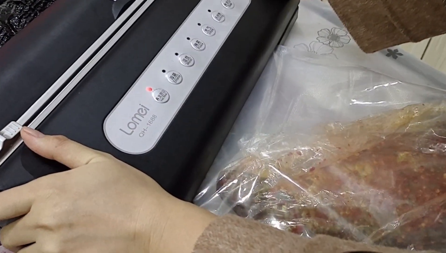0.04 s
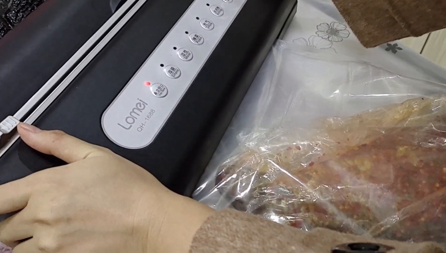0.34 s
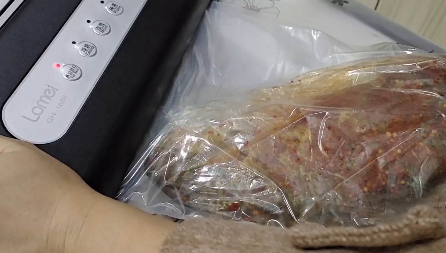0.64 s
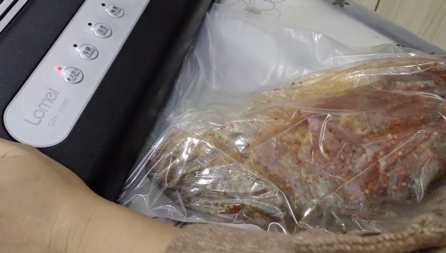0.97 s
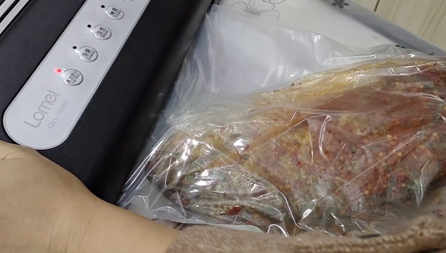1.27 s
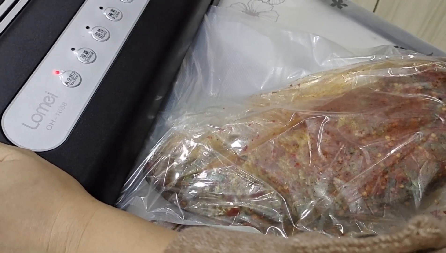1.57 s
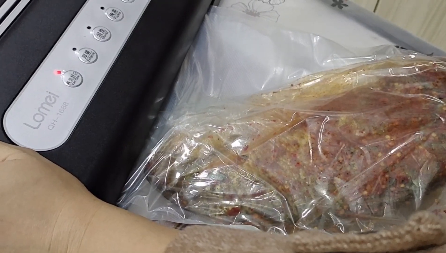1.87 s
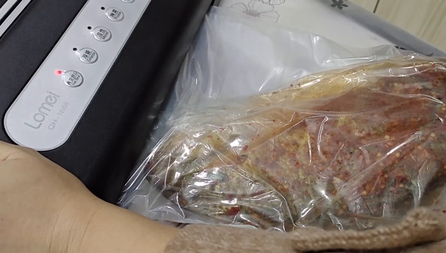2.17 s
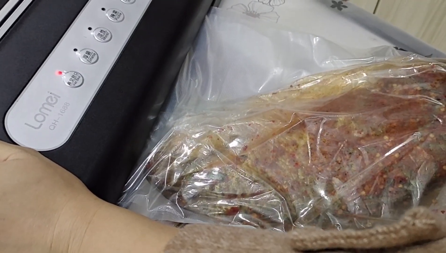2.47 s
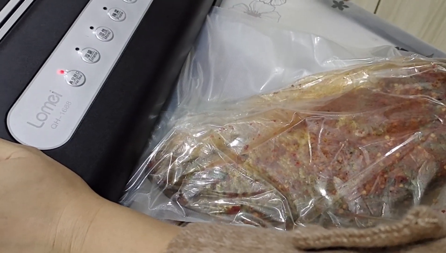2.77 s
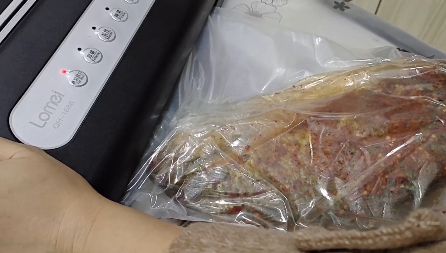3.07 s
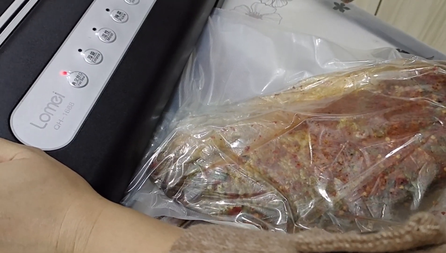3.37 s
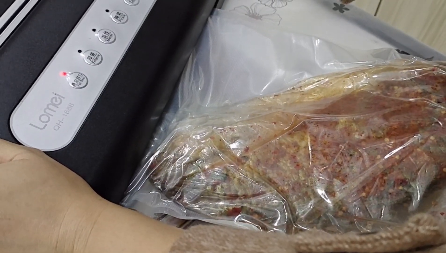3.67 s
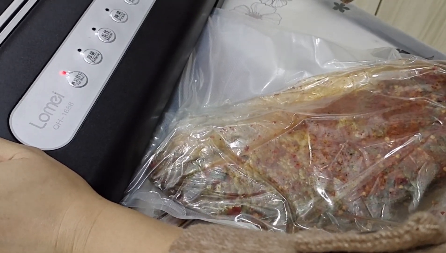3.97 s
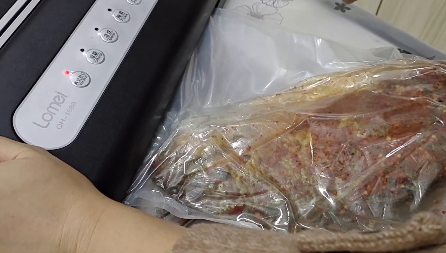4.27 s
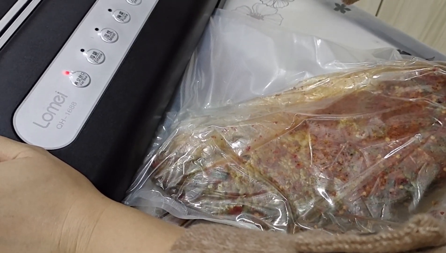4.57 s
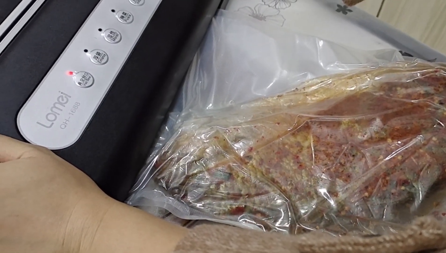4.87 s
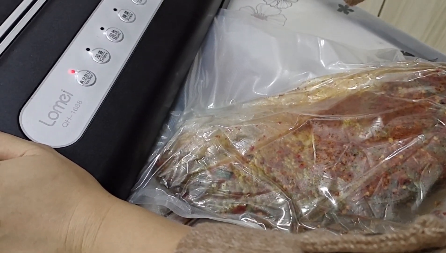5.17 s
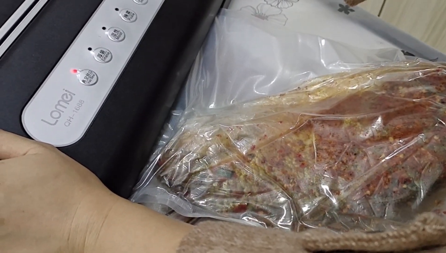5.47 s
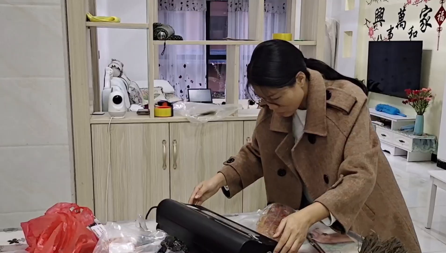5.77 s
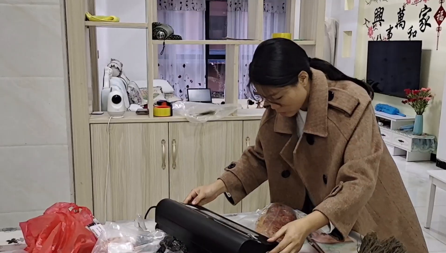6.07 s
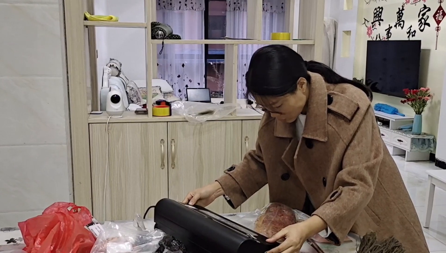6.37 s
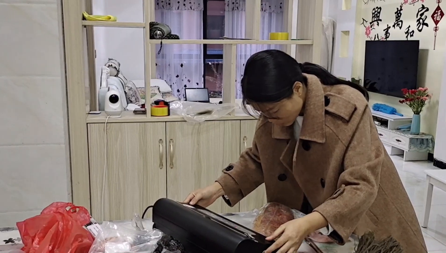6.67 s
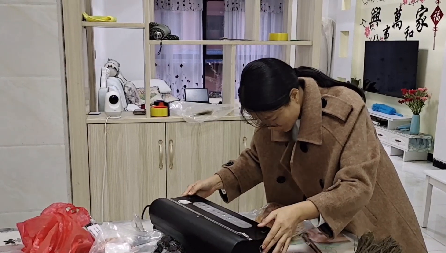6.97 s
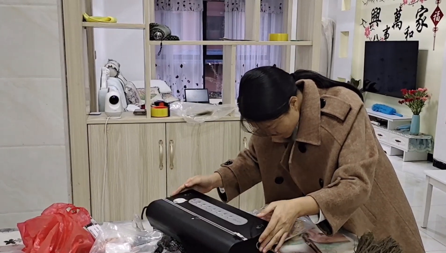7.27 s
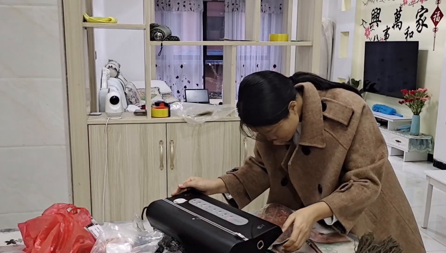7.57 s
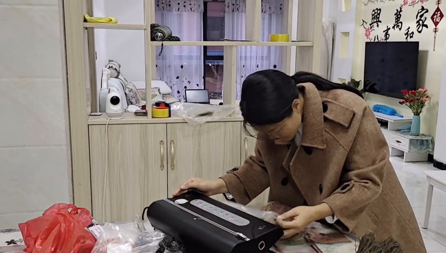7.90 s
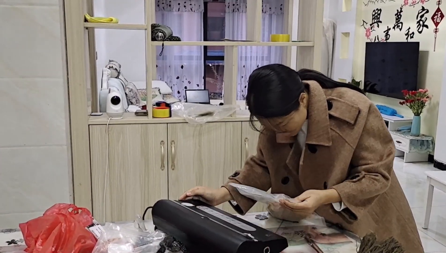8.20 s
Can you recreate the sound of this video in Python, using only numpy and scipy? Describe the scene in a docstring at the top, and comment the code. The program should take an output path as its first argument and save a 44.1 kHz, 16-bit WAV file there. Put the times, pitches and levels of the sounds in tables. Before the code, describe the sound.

Close buzzing drone of a countertop vacuum sealer with faint plastic crackles, followed by more distant knocks and a sharp lid clack.

```python
"""A buzzing drone over a ticking plastic bag, then a lid snapping shut: a countertop vacuum sealer.
Its piston pump, heard close up from two positions, turns about 45 times a second and slows under load.
Each turn gives a thump, a puff of air, valve clacks and a casing rattle; the bag's creases give way.
Then, from across a tiled room, the lid is handled and shut, the latch pressed and the bag picked up."""
import sys
import numpy as np
from scipy import signal
from scipy.fft import rfft, irfft, next_fast_len
from scipy.io import wavfile

SR = 44100
rng = np.random.default_rng(int(sys.argv[2]) if len(sys.argv) > 2 else 0)


def wav_out(sig):
    """Save sig, one row per channel (or a flat mono array), as 16-bit PCM at SR to the path in sys.argv[1]."""
    wavfile.write(sys.argv[1], SR, np.round(np.clip(np.atleast_2d(sig).T, -1, 1) * 32767).astype(np.int16))


N = 363384
TIME = np.arange(N) / SR
SWITCH_S, AWAY_S = .399, 5.692   # the scene changes: to a second close view, then across the room
FIRST_HZ, FREE_HZ, LOADED_HZ = 45.55, 44.845, 44.53   # pump speed: first position, slack bag, empty bag

# spectrum of cracking plastic: f/Hz, level/dB
CRACK_SPECTRUM = [(1500, -3.5), (2800, 6.5), (4400, 6), (7000, 3), (10000, -14), (15500, -19.5)]


def from_db(db):
    return 10 ** (np.asarray(db) / 20)


def rms_one(x):
    return x / np.sqrt(np.mean(x ** 2) + 1e-20)


def smooth_step(x):
    x = np.clip(x, 0, 1)
    return x * x * (3 - 2 * x)


def at_hz(points, hz):
    """Curve read on a log-frequency axis."""
    points_hz, values = np.transpose(points)
    return np.interp(np.log(hz + 1e-9), np.log(points_hz), values)


def pan(db):
    """Stereo gains; db is left minus right."""
    return from_db(np.array([[db], [-db]]) / 2)


def gate(start_s, end_s, fade_s=0.0015):
    return np.clip((TIME - start_s) / fade_s, 0, 1) * np.clip((end_s - TIME) / fade_s, 0, 1)


def decay(t60_s, size):
    return np.exp(-np.log(1000) * TIME[:size] / t60_s)


def mode(hz, t60_s, size):
    return np.sin(2 * np.pi * hz * TIME[:size]) * decay(t60_s, size)


def colour(x, spectrum):
    """Band-limited spectral shaping; white noise keeps its power."""
    size = next_fast_len(x.shape[-1], True)
    hz = np.arange(size // 2 + 1) * SR / size
    gain = from_db(at_hz(spectrum, hz))
    gain /= 1 + (hz / spectrum[-1][0] / 1.2) ** 8
    gain /= 1 + (.8 * spectrum[0][0] / (hz + 1)) ** 8
    return irfft(rfft(x, size) * rms_one(gain), size)[..., :x.shape[-1]]


def noise(size=N, apart_hz=900):
    """Stereo noise, alike in the bass, unrelated in the treble."""
    mid, side = rng.standard_normal((2, size))
    side = signal.sosfilt(signal.butter(1, apart_hz, "high", fs=SR, output="sos"), side)
    return rms_one(mid + side * np.array([[1], [-1]]))


def clicks(times_s, heights):
    out = np.zeros(N)
    np.add.at(out, np.clip(np.round(np.asarray(times_s) * SR).astype(int), 0, N - 1), heights)
    return out


def ring(x, hz, t60_s):
    """Resonator: a unit click starts a unit sine."""
    r, w = from_db(-60 / (t60_s * SR)), 2 * np.pi * hz / SR
    return signal.lfilter([0, np.sin(w)], [1, -2 * r * np.cos(w), r * r], x + 1e-18)


def convolve(x, response):
    return signal.oaconvolve(np.atleast_2d(x), response, axes=1)[:, :N]


def room_tone():
    """Faint, low noise of the quiet room."""
    # noise spectrum: f/Hz, level/dB
    spectrum = [(24, -40), (40, -13.5), (213, 1.5), (333, -2), (407, -8), (758, -10), (1910, -24.5),
                (6980, -29), (8310, -35), (15500, -51)]
    return from_db(-66.5) * colour(noise(), spectrum)


def room_tail(onset_s=0.009):
    """Diffuse reflections, dying fastest in the top treble; unit energy."""
    # room decay: f/Hz, t60/s
    decay_times = [(100, 0.21), (300, 0.62), (540, 0.6), (900, 0.46), (2500, 0.56), (6000, 0.54),
                   (9000, .42), (15000, 0.14)]
    edges_hz = np.geomspace(50, 16000, 15)
    tail = 0
    for low, high in zip(edges_hz, edges_hz[1:]):
        bandpass = signal.butter(2, [low, high], "band", fs=SR, output="sos")
        band = signal.sosfilt(bandpass, noise(SR, apart_hz=1000))
        tail += band * decay(at_hz(decay_times, np.sqrt(low * high)), SR)
    return rms_one(tail * np.clip(TIME[:SR] / onset_s, 0, 1)) / np.sqrt(SR)


def movements(rows, t, attack_s=0.013, t60_s=0.18):
    """Envelope of hand movements: each swells, holds and dies away."""
    envelope = 0
    for start_s, length_s, db in rows:
        swell = np.clip((t - start_s) / attack_s, 0, 1)
        release = from_db(-60 * np.maximum(t - start_s - length_s, 0) / t60_s)
        envelope = np.maximum(envelope, from_db(db) * swell * release)
    return envelope


def handling(grains_per_s=2800):
    """Hands rub dully on the housing; sleeves and bag rustle in dense grains."""
    # hand movements: t/s, length/s, level/dB
    rubs = [(5.69, .22, -59.5), (5.94, 0.27, -59.5), (6.44, .05, -67), (7.03, 0.08, -53), (7.19, .06, -57),
            (7.3, 0.11, -67), (7.55, .05, -67.5), (8.0, 0.2, -65.5)]
    rustles = [(5.69, 0.026, -59.5), (5.78, 0.093, -60), (6.06, 0.11, -74.5), (6.44, 0.033, -72),
               (6.98, 0.052, -62), (7.05, 0.063, -52), (7.19, 0.022, -64), (7.31, 0.084, -71),
               (7.78, 0.14, -74), (7.925, 0.081, -55), (8.03, 0.12, -58)]
    # their spectra: f/Hz, level/dB
    rub_spectrum = [(60, -14.5), (150, -3), (280, 4.5), (420, -4), (700, -7), (1100, -25), (1600, -31.5),
                    (2500, -18.5)]
    rustle_spectrum = [(450, -6), (750, 0.5), (1100, 5.5), (1500, -2.5), (1950, -8), (2350, 0), (3000, 1.5),
                       (4200, -7.5), (7300, -7), (9000, -28.5), (11000, -37.5), (15500, -32.5)]
    start = int(AWAY_S * SR)
    t = TIME[start:]
    grains = signal.lfilter([1], [1, -.95], rng.random(len(t)) < grains_per_s / SR)
    rustle = movements(rustles, t) * colour(rms_one(noise(len(t)) * grains), rustle_spectrum)
    rub = movements(rubs, t) * colour(noise(len(t)), rub_spectrum)
    return np.pad(from_db(-2) * rub + pan(5) * rustle, ((0, 0), (start, 0)))


def table_bumps(swell_s=0.011):
    """The machine rocks on its rubber feet: soft thuds and hollow knocks."""
    # knocks on the table: t/s, f/Hz, level/dB, t60/s
    knocks = [(5.839, 289.3, -42.5, 0.25), (5.851, 221.6, -40.5, 0.17), (5.898, 285, -40.5, 0.099),
              (6.086, 410, -48, 0.11), (6.258, 252, -46.5, 0.19), (6.295, 251.5, -47.5, 0.13),
              (7.066, 812, -41, .2), (7.08, 223, -31, 0.078), (7.188, 386, -43, 0.08),
              (7.204, 335.6, -37, 0.075), (7.21, 950, -41, .06), (7.87, 119.6, -56, 0.57)]
    return sum(ring(clicks([s], from_db(db)), hz, t60_s) * smooth_step((TIME - s) / swell_s)
               for s, hz, db, t60_s in knocks)


def creases(rows, spectrum, gain_db, t60_s, size=4096):
    """Each crease gives way in a short noise burst."""
    out = np.zeros((2, N + size))
    for s, db in rows:
        burst = colour(noise(size) * decay(t60_s, size), spectrum)
        out[:, int(s * SR):int(s * SR) + size] += from_db(db + gain_db) * burst
    return out[:, :N]


def bag_lifted():
    """The bag snaps as it is picked up."""
    # snaps: t/s, level/dB
    snaps = [(7.3816, -53), (7.9349, -41), (7.9872, -38.5), (8.1244, -45), (8.1648, -38), (8.177, -34)]
    return creases(snaps, CRACK_SPECTRUM, gain_db=-8.5, t60_s=0.036)


def bag_shrinking(small_count=16):
    """Large creases crack and ring the taut film; small ones tick at random."""
    # large creases: t/s, level/dB
    large = [(.6116, -45), (1.0177, -40), (1.1239, -47), (1.262, -41), (1.3228, -38), (1.6153, -46),
             (1.689, -36), (2.3516, -44), (2.3639, -37.5), (2.5751, -45), (2.59, -37.5), (2.7522, -43),
             (2.9996, -50), (3.0124, -38), (3.048, -42), (3.07, -45), (3.129, -41), (3.284, -43),
             (3.491, -40), (3.5364, -41), (3.6068, -32), (3.613, -42), (3.9838, -35), (4.057, -40.5),
             (4.2219, -38), (4.29, -37), (4.8579, -44), (4.8759, -37)]
    # ringing film: f/Hz, level/dB
    film_spectrum = [(1800, -6), (2600, 0.5), (3400, 1.5), (4400, 0.5), (5500, -6), (8000, -15)]
    cracks = creases(large, CRACK_SPECTRUM, gain_db=2.5, t60_s=0.017)
    film = creases(large, film_spectrum, gain_db=-4.5, t60_s=0.035)
    small = zip(rng.uniform(SWITCH_S, AWAY_S, small_count), rng.normal(-46, 3, small_count))
    ticks = creases(small, CRACK_SPECTRUM, gain_db=0, t60_s=0.021)
    return (cracks + film + ticks) * pan(-0.79)


def latches(size=4096):
    """A catch springs over its edge: a sharp crack and the ring of the stiff plastic hook."""
    # catches: t/s, level/dB, low-pass/Hz
    catches = [(5.832, -40, 2500), (6.5874, -19, 14000), (6.599, -24, 8000), (7.0614, -34.5, 5600)]
    # hook modes: f/Hz, level/dB, t60/s
    hook_modes = [(2490, -9.5, 0.03), (3030, -3.5, .035), (3580, -3.5, 0.04), (4260, -9, .025),
                  (5000, -6.5, 0.035), (7200, -9, 0.04)]
    out = np.zeros((2, N))
    for s, db, lowpass_hz in catches:
        crack = from_db(-2) * colour(noise(size) * decay(0.015, size), CRACK_SPECTRUM)
        hook = sum(from_db(mode_db + rng.normal(-4, 2, (2, 1))) * mode(hz, t60_s, size)
                   for hz, mode_db, t60_s in hook_modes)
        click = signal.lfilter(*signal.butter(2, lowpass_hz, fs=SR), crack + hook)
        out[:, int(s * SR):int(s * SR) + size] += from_db(db) * click
    return out


def lid(crack_t60_s=0.06, shudder_t60_s=0.26, contact_cycles=3, size=16384):
    """Each blow is a crack, a shudder of loose plastic parts and the housing's modes."""
    # blows: t/s, level/dB, low-pass/Hz, pan/dB
    blows = [(5.834, -44.5, 1300, 2), (5.860, -48, 1200, 3.5), (5.902, -56, 500, -1.5),
             (6.452, -62.5, 1000, 1.5), (6.5866, -16.5, 14000, 1), (6.598, -19, 6900, 3.5),
             (6.621, -18.5, 800, -1), (7.036, -48, 400, -0.5), (7.05, -49.5, 900, 0), (7.06, -40, 3500, 4),
             (7.072, -41, 2000, 2), (7.087, -38.5, 1200, -2), (7.188, -48.5, 1000, 5),
             (7.203, -46.5, 2800, 4), (7.236, -52, 800, 1.5)]
    # crack and shudder: f/Hz, level/dB
    spectrum = [(70, -38.5), (115, -3), (160, -2), (205, -6.5), (270, -4.5), (370, 0), (540, 1.5),
                (900, -0.5), (1350, -8.5), (2100, -9.5), (3200, -9.5), (7300, -20), (10500, -32),
                (15500, -37)]
    # housing modes: f/Hz, level/dB, t60/s
    housing = [(124.6, -13, 0.44), (203, -3.5, 0.14), (419, -10, 0.18), (508.5, -7.5, 0.3), (586, -9, .2),
               (662, -6.5, 0.15), (830, -4.5, 0.14), (970, 0.5, 0.1), (1300, -12, 0.16),
               (2106, -11.5, 0.092), (2860, -14.5, 0.19), (3000, -16, 0.18)]
    envelope = from_db(-1) * decay(crack_t60_s, size) + from_db(-4) * decay(shudder_t60_s, size)
    modes = np.array([from_db(db - 5) * mode(hz, t60_s, size) for hz, db, t60_s in housing])
    length = size - 2048
    out = np.zeros((2, N))
    for s, db, lowpass_hz, pan_db in blows:
        strengths = rng.choice([-1, 1], len(modes)) * from_db(rng.normal(0, 2, len(modes)))
        blow = colour(noise(size) * envelope, spectrum) + strengths @ modes
        blow = signal.lfilter(*signal.butter(1, lowpass_hz, fs=SR), blow[:, :length])
        blow *= np.clip(TIME[:length] * lowpass_hz / contact_cycles, 0, 1)   # soft contacts swell slower
        highpass_hz = np.interp(db, [-36, -22], [170, 78])   # light blows raise little bass
        blow = signal.lfilter(*signal.butter(2, highpass_hz, "high", fs=SR), blow)
        out[:, int(s * SR):int(s * SR) + length] += from_db(db) * pan(pan_db) * blow
    return out


def crank(vacuum, start_turn=.869, switch_turn=.135):
    """Running count of pump turns; the motor slows as the vacuum grows."""
    speed_hz = np.where(TIME < SWITCH_S, FIRST_HZ, FREE_HZ + (LOADED_HZ - FREE_HZ) * vacuum)
    return start_turn + np.cumsum(speed_hz) / SR + switch_turn * (TIME > SWITCH_S)


def once_a_turn(turns, place, jitter_s):
    """Times at which the crank passes a place (0-1) in its turn."""
    times_s = np.interp(np.arange(1, int(turns[-1])) + place, turns, TIME)
    return rng.normal(times_s, jitter_s)


def resonances(hz, centre_hz, width_hz, db, pan_db, lag_ms):
    """Complex stereo gains of tones passing through a set of resonances."""
    power = (from_db(db) / (1 + (2 * (hz[:, None] - centre_hz) / width_hz) ** 2)) ** 2
    sides = from_db([pan_db, -pan_db])
    gain = np.sqrt(sides / sides.mean(axis=0) @ power.T)
    lag_rad = 2 * np.pi * hz * (power @ lag_ms) / power.sum(axis=1) / 1000
    return gain * np.exp(1j * np.array([-lag_rad, lag_rad]) / 2)


def harmonics(turns, orders, gains, size=8192):
    """One-turn waveform of the given harmonics, read at the crank's angle."""
    one_turn = gains @ np.exp(2j * np.pi * np.outer(orders, np.arange(size) / size))
    return np.sqrt(2) * one_turn.real[:, (turns % 1 * size).astype(int)]


def by_load(vacuum, half_at, first, free, half, loaded):
    """The first position's sound, then a blend from free through half to full load."""
    to_half = np.interp(vacuum, [0, half_at], [0, 1])
    to_full = np.interp(vacuum, [half_at, 1], [0, 1])
    return np.where(TIME < SWITCH_S, first, free + (half - free) * to_half + (loaded - half) * to_full)


def air(turns, pulse_depth=0.12, place=0.75):
    """Air rushes through the pump, harder once a turn."""
    # air rush: f/Hz, level/dB
    spectrum = [(40, -4.5), (90, -9.5), (170, 5), (350, -2), (600, 5), (950, 15.5), (1450, 0.5), (1850, -8),
                (2250, -3), (3200, -2.5), (4500, -8), (7000, -11), (9000, -18), (10500, -25.5),
                (15500, -23.5)]
    pulsing = 1 + pulse_depth * np.cos(2 * np.pi * (turns - place))
    return from_db(-40) * colour(noise(apart_hz=2180), spectrum) * pulsing


def casing(turns, place, gain_db, t60_s, size=4096):
    """A piston knock shakes the plastic casing's many modes, alike on every turn."""
    # casing rattle: f/Hz, level/dB
    spectrum = [(820, -46), (1400, 5.5), (1780, -11), (2200, -9), (2430, -5), (3160, -4.5), (3830, -2),
                (4100, -21), (5000, -7.5), (6330, -10.5), (6860, -25), (8910, -32), (10700, -64),
                (15500, -54)]
    times_s = once_a_turn(turns, place, jitter_s=4e-6)
    knocks = clicks(times_s, from_db(rng.normal(gain_db, 0.8, len(times_s))))
    response = colour(noise(size, apart_hz=4620) * decay(t60_s, size), spectrum)
    return convolve(knocks, response)


def valves(turns, vacuum, loaded_at=0.49):
    """Flap valves clack open and shut, ringing the pump head; their energy follows the load."""
    # clacks: place/turn, f/Hz, width/Hz, level/dB (first position, free, loaded), pan/dB
    clacks = [(.17, 2340, 270, -64, -42.5, -49, -7), (.17, 2560, 66, -56, -47, -46, -4),
              (.65, 3300, 270, -50, -35, -64, -7.5), (.22, 2970, 110, -50, -46, -41.5, -6),
              (.2, 3760, 130, -47, -45, -42.5, -4), (.7, 3620, 170, -41, -56, -49, -8),
              (.67, 2265, 133, -67, -45.5, -40, -1), (.72, 3010, 68, -44, -59, -49, -11),
              (.7, 3860, 106, -42.5, -55, -39.5, 3), (.68, 4380, 90, -50, -51.5, -52, 6),
              (.7, 6270, 85, -56, -47, -49.5, 18), (.7, 5690, 36, -55, -51.5, -53, 8),
              (.67, 5240, 120, -44, -51, -44.5, 12.5), (.67, 5100, 600, -52, -44, -55, 8)]
    load = smooth_step(vacuum / loaded_at)
    out = np.zeros((2, N))
    for place, hz, width_hz, first_db, free_db, loaded_db, pan_db in clacks:
        times_s = once_a_turn(turns, place, jitter_s=5e-6)
        share = np.interp(times_s, TIME, load)
        heights = np.sqrt((1 - share) * from_db(free_db) ** 2 + share * from_db(loaded_db) ** 2)
        heights = np.where(times_s < SWITCH_S, from_db(first_db), heights)
        heights *= from_db(rng.normal(0, 1, len(times_s)))
        out += pan(pan_db) * ring(clicks(times_s, heights), hz, t60_s=np.log(1000) / (np.pi * width_hz))
    return out


def pump_head(turns, vacuum, place=.76, scatter_rad=0.76, half_at=.38):
    """The valves keep the metal head ringing: harmonics near its resonances sing as clean tones."""
    # head resonances: f/Hz, width/Hz, level/dB (first position, free, half loaded, loaded)
    head = [(1642, 84, -63, -68, -59, -65.5), (1874, 45, -61.5, -70, -67, -57.5),
            (1983, 38, -66, -70, -75, -63), (2050, 48, -78, -71, -71, -62), (2225, 100, -80, -56, -60, -60),
            (2400, 70, -64, -71, -65, -58), (2533, 57, -68, -57, -59, -65), (2635, 80, -58, -72, -63, -60),
            (2755, 96, -64, -60, -69, -64), (2961, 72, -52.5, -68, -70, -50),
            (3160, 80, -58, -66, -69, -60), (3300, 55, -61, -64, -64, -59),
            (3408, 39, -72, -56.5, -72, -67), (3520, 31, -72, -50, -73, -72),
            (3745, 41, -52.5, -59, -49, -57.5), (3825, 45, -55, -64, -45, -46),
            (3870, 33, -53, -76, -48, -48.5), (3920, 45, -66, -73, -70, -69)]
    hz, width_hz, *levels_db = np.transpose(head)
    pan_db, lag_ms = np.zeros(len(hz)), np.full(len(hz), 0.053)
    orders = np.arange(35, 90)
    phase = rng.normal(-2 * np.pi * orders * place, scatter_rad, (2, len(orders)))   # a path per side
    speeds_hz = FIRST_HZ, FREE_HZ, (FREE_HZ + LOADED_HZ) / 2, LOADED_HZ
    gains = [resonances(orders * speed_hz, hz, width_hz, db, pan_db, lag_ms)
             for speed_hz, db in zip(speeds_hz, levels_db)]
    states = [harmonics(turns, orders, gain * np.exp(1j * phase)) for gain in gains]
    return from_db(-2) * by_load(vacuum, half_at, *states)


def piston_hum(turns, vacuum, uneven_db=0.23, half_at=0.57):
    """Each stroke bunches its harmonics into one burst a turn; body resonances set their levels."""
    # strokes: top harmonic, place/turn, phase scatter/rad, resonance/Hz, width/Hz
    strokes = [(10, .76, 0.46, 348, 293), (13, .3, 0.6, 545, 600), (23, .31, 0.31, 924, 220),
               (34, .18, 1.43, 1296, 260)]
    # body resonances, first position: f/Hz, width/Hz, level/dB, pan/dB, left lag/ms
    first_body = [(112.7, 28, -50, -4.0, 0.48), (211.0, 26.7, -40, -1.5, 0.09), (330, 77, -42, 0.5, 0.12),
                  (414, 25, -43.5, -7, 0.21), (511, 29, -40, -5, 0.06), (567, 51, -38, 4, 0.14),
                  (896, 146, -37, -0.5, 0.2), (1010, 93, -46, -13, 0.58), (1135, 40, -54, 0, .3),
                  (1250, 45, -40.5, -0.5, 0.27), (1430, 60, -48, 10, 0.4)]
    # second position: f/Hz, width/Hz, level/dB (free, half loaded, loaded), pan/dB, left lag/ms
    body = [(116.3, 26, -48.5, -47.5, -47, -4, 0.61), (245, 67.6, -47, -49.5, -49.5, -2.1, 0.14),
            (305.3, 22, -47.5, -73, -82, 3.5, 0.2), (379.2, 26.5, -37, -36, -31, 3, 0.38),
            (429.2, 59.6, -42, -41.5, -52.5, -1.5, 0.42), (500.2, 37, -42.5, -52.5, -44.5, 2, 0.53),
            (559.9, 25.6, -32.5, -32, -32.5, 6.5, 0.28), (682.5, 32, -43.5, -44, -40.5, -1, 0.04),
            (812, 21, -41, -41.5, -36.5, -23, 0.13), (840, 67, -35, -36.5, -39.5, -5.5, 0.2),
            (903.4, 23.4, -36.5, -36, -33, 10.5, 0.23), (945.4, 29, -44, -33.5, -32.5, -3, 0.25),
            (992.8, 21.5, -37, -47, -56, 8.5, 0.31), (1026, 9.9, -71, -68, -44.5, -12, 0.2),
            (1063.8, 20.5, -39.5, -47, -46.5, 14.5, 0.24), (1157, 25.6, -44, -41.5, -44.5, 3, 0.29),
            (1180.6, 28, -38, -46, -45, 9, 0.33), (1254, 36, -46, -48.5, -38, -1, 0.29),
            (1296, 25, -58, -54, -54, -3, 0.36), (1342, 19, -41, -44, -44.5, -1, 0.56),
            (1505, 110, -56.5, -49, -51.5, 4, 0.37), (1515, 45, -54, -58, -50, 10.5, 0.45)]
    orders = np.arange(2, 35)
    stroke_index = np.searchsorted([row[0] for row in strokes[:-1]], orders)
    _, place, scatter_rad, stroke_hz, stroke_width_hz = np.array(strokes)[stroke_index].T
    lag_rad = 2 * np.arctan(2 * (orders * LOADED_HZ - stroke_hz) / stroke_width_hz)
    phase = rng.normal(-2 * np.pi * orders * place - lag_rad, scatter_rad)
    hz, width_hz, *levels_db, pan_db, lag_ms = np.transpose(body)
    speeds_hz = FREE_HZ, (FREE_HZ + LOADED_HZ) / 2, LOADED_HZ
    gains = [resonances(orders * FIRST_HZ, *np.transpose(first_body))]
    gains += [resonances(orders * speed_hz, hz, width_hz, db, pan_db, lag_ms)
              for speed_hz, db in zip(speeds_hz, levels_db)]
    states = [harmonics(turns, orders, gain * np.exp(1j * phase)) for gain in gains]
    each_turn = np.arange(int(turns[-1]) + 1)
    strength = np.interp(turns, each_turn, from_db(rng.normal(-0.22, uneven_db, len(each_turn))))
    return strength * by_load(vacuum, half_at, *states)


def pump(taut_s=1.3, empty_s=5.7, left_lag_s=.0005):
    """The piston pump draws out slack air first; then the vacuum builds and levels off."""
    vacuum = smooth_step((TIME - taut_s) / (empty_s - taut_s))
    turns = crank(vacuum)
    rattle = casing(turns, place=.66, gain_db=-44.5, t60_s=0.064)
    rattle += casing(turns, place=.12, gain_db=-43, t60_s=0.078)
    first_trim = np.where(TIME < SWITCH_S, from_db(-0.5), 1)
    treble = valves(turns, vacuum) + first_trim * (rattle * pan(4.4) + air(turns) * pan(0.79))
    treble[0] = np.roll(treble[0], round(left_lag_s * SR))   # arrives from the right
    tones = piston_hum(turns, vacuum) + pump_head(turns, vacuum)
    first_position = gate(-1, SWITCH_S)
    second_position = gate(SWITCH_S, AWAY_S, fade_s=0.00048) * np.clip((TIME - SWITCH_S) / 0.016, 0, 1)
    return (tones + treble) * (first_position + second_position)


def scene():
    """Pump and bag close up, then the handling across the room."""
    drone = pump()
    ticks = bag_shrinking()
    far = lid() + latches() + table_bumps() + handling() + bag_lifted()
    highpass = signal.butter(4, 95, "high", fs=SR, output="sos")   # the far sounds lose their deep bass below 95 Hz
    far = signal.sosfilt(highpass, far + 1e-18)
    floor = room_tone()
    echoes = convolve(from_db(-4.5) * far + from_db(-5.5) * ticks, room_tail())
    return drone + ticks + far + echoes + floor


def record(dry):
    """Steep low-pass at 15.8 kHz."""
    return signal.sosfilt(signal.ellip(10, .1, 80, 15800, fs=SR, output="sos"), dry)


dry = scene()
out = record(dry)
wav_out(out)
```